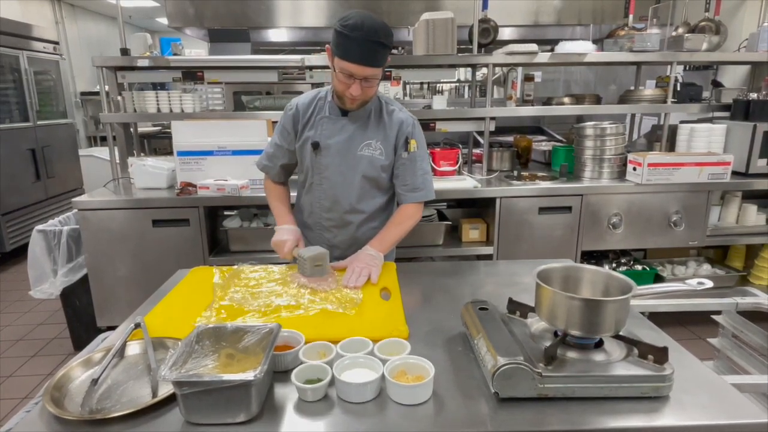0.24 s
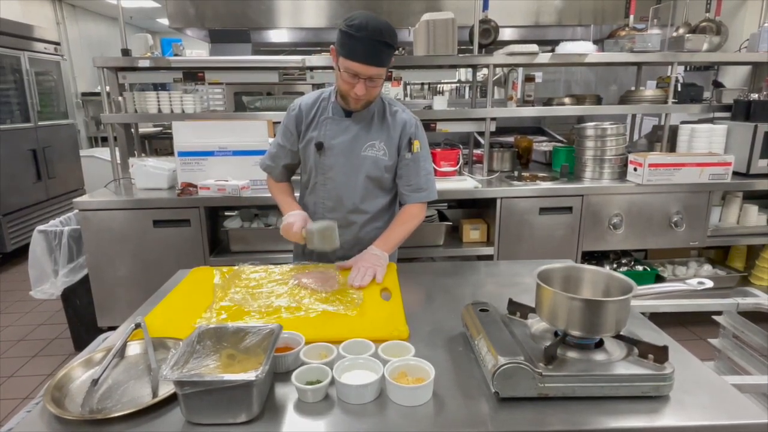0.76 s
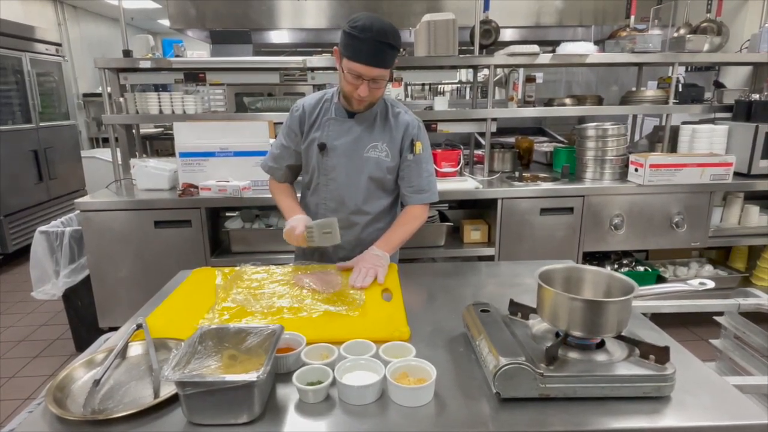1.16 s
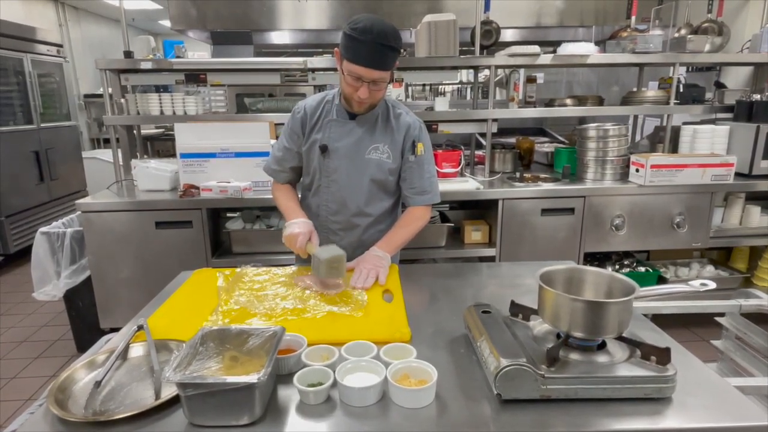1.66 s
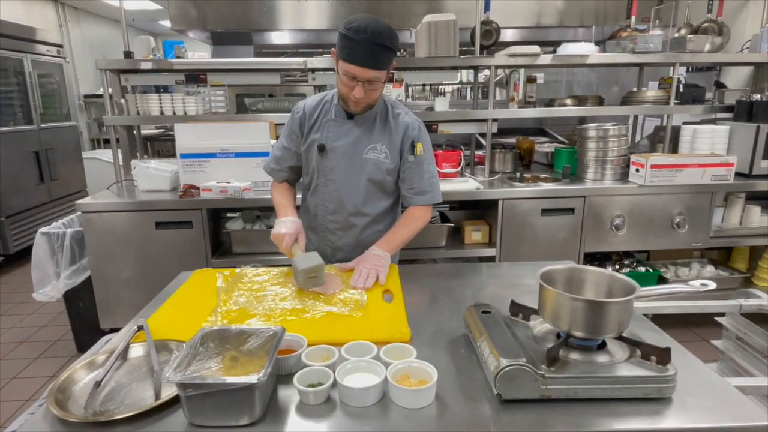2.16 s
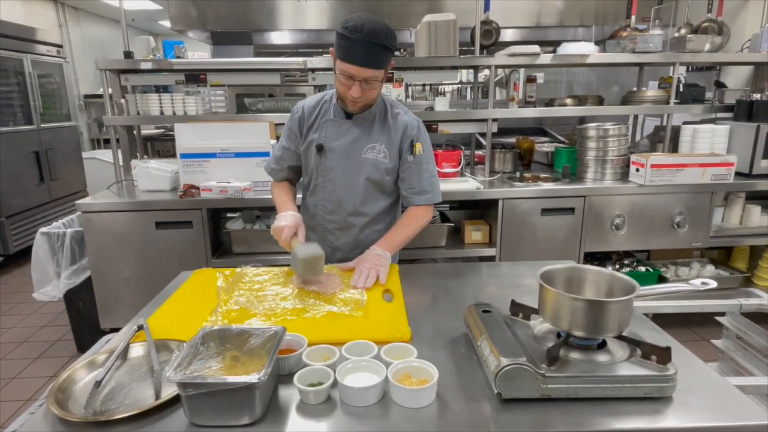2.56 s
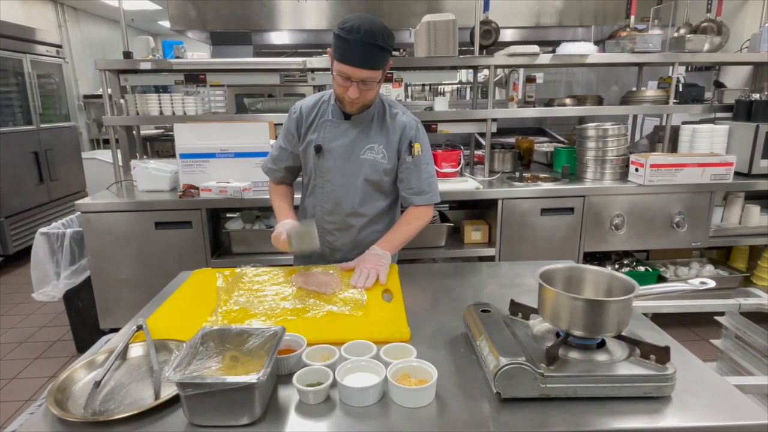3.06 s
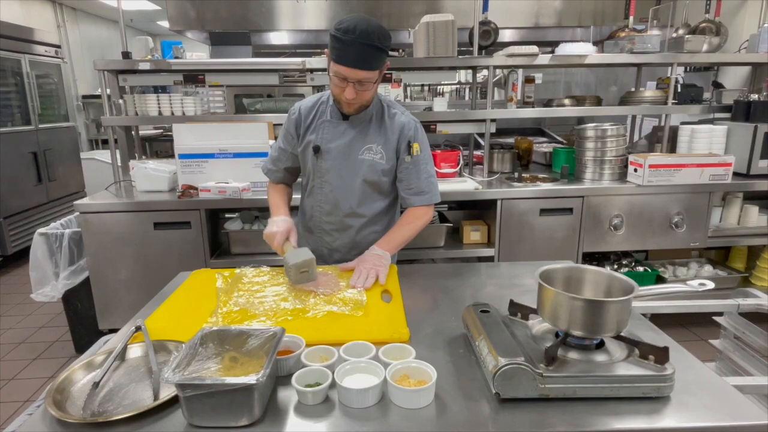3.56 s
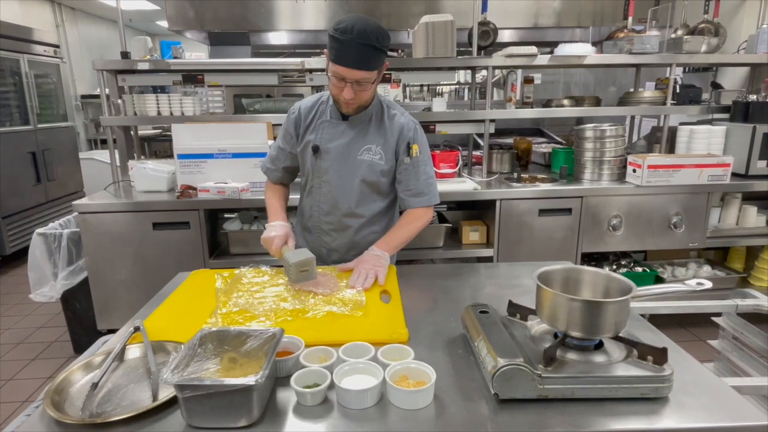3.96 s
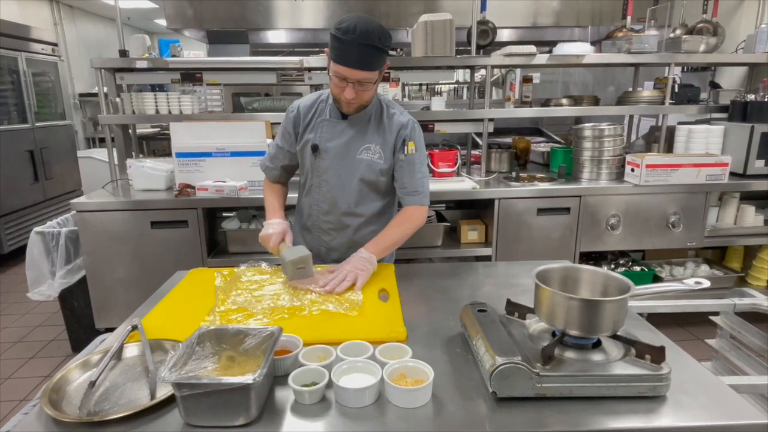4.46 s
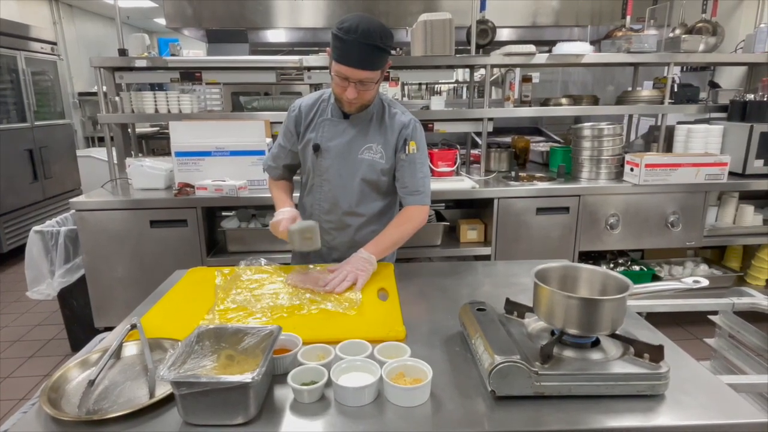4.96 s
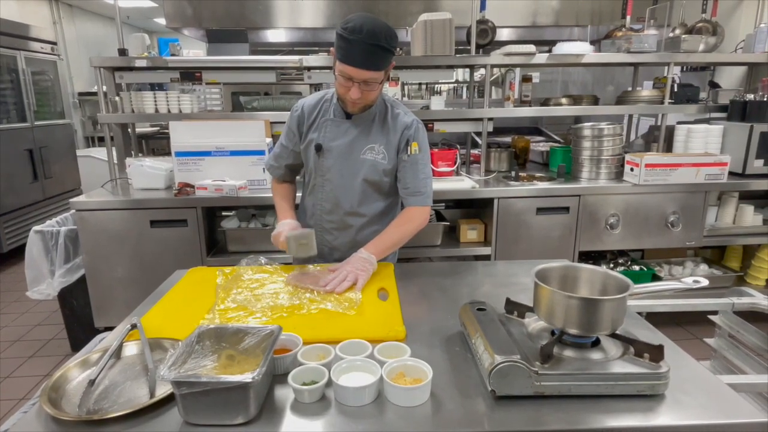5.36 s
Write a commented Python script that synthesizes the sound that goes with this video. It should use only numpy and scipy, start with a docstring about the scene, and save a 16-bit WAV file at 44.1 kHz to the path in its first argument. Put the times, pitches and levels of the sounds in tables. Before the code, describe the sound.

A metal mallet pounds meat under plastic film on a cutting board, close to the microphone, about three times a second from 0.1 seconds. Each blow is a wet slap with a low thump and a knock. Pans and a stove on the steel table clatter twice in quick succession after each hit, and a small dish chinks. The first blow is the hardest; they soften to their lightest around 1.5 seconds and are strong again from about 2.5. After a blow at 3.7 seconds comes a half-second gap, then four more, slightly weakening, the last at 5.3. The film crinkles softly around 1.9 and 4.5 seconds, and a faint low hum swells and fades around 4.5. The tiled kitchen adds a short, bright echo, and extractor fans rush quietly in the background throughout. The loudest peaks slightly overload the microphone.

```python
"""A wet slap and a low thump, close to the microphone: a metal mallet pounds chicken under plastic film.
The cutting board lies on a steel table in a tiled kitchen. At each blow, pans and a stove on the table
jump and clatter twice, on the rebound and on landing, and a small dish chinks. Between blows the film
crinkles twice, and a faint hum comes and goes once. Extractor fans run at the back of the room.
One channel; the loudest peaks overload the microphone."""
import sys
import numpy as np
from scipy import signal
from scipy.fft import rfft, irfft, next_fast_len
from scipy.io import wavfile
from scipy.ndimage import map_coordinates

SR = 44100
rng = np.random.default_rng(int(sys.argv[2]) if len(sys.argv) > 2 else 0)


def file_out(sig):
    """Save sig as 16-bit WAV at sys.argv[1]."""
    # one column per channel
    cols = np.atleast_2d(sig).T
    # limit, then scale
    lim = np.clip(cols, -1, 1)
    pcm = np.round(lim * 32767).astype(np.int16)
    wavfile.write(sys.argv[1], SR, pcm)


N = 247840
LEAD = SR // 2  # run-in, so the room already rings at the start
SPAN = N + LEAD

# mallet blows, the first only echoing into the start: t/s, force/dB, hardness/dB (low on thick meat)
MALLET_BLOWS = [(-.235, -1, -14), (0.1173, 1, 2), (0.4885, -1.7, -8), (0.8347, -4.7, 1), (1.1699, -5.7, 5),
                (1.4456, -10, 7), (1.7058, -10.7, -9), (1.998, -6.2, -5), (2.3398, -2.7, 1),
                (2.6847, -2, -3), (3.0232, -.9, -2), (3.3767, -1.2, -4), (3.7282, -.6, 2),
                (4.2416, -1.4, 2), (4.638, -2.7, 2), (5.0042, -2.6, 0), (5.3306, -4.9, .5)]
# the wrapped meat is pushed along the board: start/s, end/s, level/dB
MEAT_SLIDES = [(1.797, 2.08, -24), (4.359, 4.67, -23.5)]
# ringing modes: f/Hz, relative level/dB, t60/s
TABLE_MODES = [(55.4, -9, 0.23), (103, -5.5, 0.12), (193.2, -12.5, 0.16), (117.4, -19, 0.2),
               (53.1, -25.5, .7)]  # board and table top
HEAD_MODES = [(1294, -5, 0.079), (960, 3, 0.016), (1600, -8, 0.034)]  # mallet head on the board
PAN_MODES = [(395, -8, .1), (562, -3, .15), (598, -12, .45), (690, -8, .15), (1260, -2, .16),
             (1449, -6, .15), (1756, -3, .12), (1980, -4, .06), (2794, -1, .15), (3085, -4.5, .28),
             (3252, -2, .14), (4025, -10, .12), (4162, -11, .12), (6140, -4, .09)]  # pans and stove
DISH_MODES = [(3110, -9, .07), (5520, -7, .04), (5914, -5, .05), (6140, 0, .09), (6250, -8, .15),
              (6350, -1, .07), (8090, -6, .04), (8400, -5, .04)]  # small china dish
# noise spectra: f/Hz, relative level/dB
SLAP_SPECTRUM = [(200, -9), (1500, -19), (3000, 2), (5000, 1.5), (8000, 4.5), (10500, -2), (13000, -11.5),
                 (16000, -5.5)]  # wet film, struck
KNOCK_SPECTRUM = [(150, -21.5), (450, -5.5), (900, -6.5), (1300, -5), (1800, -7.5), (3500, -15),
                  (9000, -33)]  # board on steel
CLATTER_SPECTRUM = [(60, -32), (130, -3), (280, -5.5), (420, -0.5), (900, -2.5), (1800, 2), (2400, -1.5),
                    (4500, -5), (6500, -5.5), (8500, -7), (11500, -20.5), (16000, -37)]  # rattling cookware
SPARKLE_SPECTRUM = [(1000, -9), (4000, -11), (7000, 2.5), (10000, -10), (16000, -12)]  # hard contacts on metal
FILM_SPECTRUM = [(200, -16), (500, -5), (1000, -5), (2500, -10), (7000, -18.5), (10000, -24.5),
                 (16000, -49)]  # crinkling film
AIR_SPECTRUM = [(15, -31), (25, -1), (50, -17), (92, -27), (123, -9), (153, -15.5), (240, -12.5), (330, -8),
                (470, -12), (540, -7.5), (750, -10.5), (2000, -18.5), (6000, -33), (16000, -61)]  # air in the extractor hoods
# fan blade tones: f/Hz, level/dB
BLADE_TONES = [(242, -44.5), (528, -58), (603, -46)]
# decay of the tiled room: f/Hz, t60/s
ROOM_DECAY = [(60, 0.13), (250, 0.84), (600, 0.57), (2000, 0.63), (5000, 0.54), (8000, 0.48), (12000, 0.47),
              (16000, 0.4)]
# colour of its echo: f/Hz, relative level/dB
ROOM_COLOUR = [(60, -6), (200, -6), (600, 6), (2000, 4.5), (7000, 2.5), (12000, -11)]


def amp(db):
    """Decibels to gain."""
    return 10 ** (np.asarray(db) / 20)


def unit(x):
    """Scale to rms 1."""
    return x / np.sqrt(np.mean(x ** 2) + 1e-20)


def along(points, hz):
    """Read (f/Hz, value) points on a log frequency axis."""
    freqs, values = np.transpose(points)
    return np.interp(np.log(hz + 1), np.log(freqs + 1), values)


def noise(spectrum, size):
    """Coloured noise of rms 1."""
    m = next_fast_len(size + 4096)
    colour = amp(along(spectrum, np.fft.rfftfreq(m, 1 / SR)))
    return unit(irfft(rfft(rng.standard_normal(m)) * colour, m)[:size])


def wobble(rate, size):
    """A smooth random curve with rate knots a second."""
    knots = rng.standard_normal(int(size * rate / SR) + 4)
    return map_coordinates(knots, [np.arange(size) * rate / SR])


def burst(t, rise, t60):
    """An envelope that swells to 1 in rise seconds and then dies away."""
    return np.sin(np.clip(t / rise, 0, 1) * np.pi / 2) * amp(-60 * np.maximum(t - rise, 0) / t60)


def ring(modes, t, scatter_db):
    """Damped modes at chance strengths; neighbours in the list swing in opposite senses."""
    sound = np.zeros(len(t))
    for k, (hz, db, t60) in enumerate(modes):
        envelope = amp(db + scatter_db * rng.standard_normal() - 60 * t / t60)
        sound += (-1) ** (k + 1) * envelope * np.sin(2 * np.pi * hz * t)
    return sound


def add(track, s, sound):
    """Mix a sound into the track at time s."""
    start = max(LEAD + round(s * SR), 0)
    track[start:start + len(sound)] += sound[:len(track[start:])]


def slap():
    """Nearest the microphone, the wet film snaps on contact and again, weakly, as the board rebounds."""
    track, t = np.zeros(SPAN), np.arange(SR // 10) / SR
    for s, force_db, hardness_db in MALLET_BLOWS:
        snaps = burst(t, rise=.00064, t60=.013) + amp(-8) * burst(t - .009, rise=.00025, t60=.0064)
        add(track, s, amp(-3.7 + force_db + hardness_db) * snaps * noise(SLAP_SPECTRUM, len(t)))
    return track


def mallet():
    """The head knocks on the board through the meat and bends the table top."""
    track, t = np.zeros(SPAN), np.arange(SR // 2) / SR
    for s, force_db, hardness_db in MALLET_BLOWS:
        # a softer blow rests longer on the meat and favours the lowest modes
        db_per_octave = .5 * (force_db + 2.1)
        modes = [(hz, db + db_per_octave * np.log2(hz / 90), t60) for hz, db, t60 in TABLE_MODES]
        thump = ring(modes, t, scatter_db=.5) * (1 - np.exp(-t / .0008))
        add(track, s, amp(-.2 + .92 * force_db) * thump)
        head = ring(HEAD_MODES, t, scatter_db=2) * (1 - np.exp(-t / .00097))
        # the board knocks, then chatters on the steel
        knocks = burst(t, rise=.0014, t60=.049) + amp(-2.5) * burst(t - .0095, rise=.00094, t60=.18)
        board = knocks * noise(KNOCK_SPECTRUM, len(t))
        add(track, s, amp(-9 + force_db + hardness_db) * (board + amp(4.5) * head))
    return track


def cookware():
    """Along the table, jolted pans and stove rattle against the rebounding top, then land and settle."""
    track, t = np.zeros(SPAN), np.arange(SR // 2) / SR
    contacts_per_s, contact_decay_s = 900, .00045
    for s, force_db, _ in MALLET_BLOWS:
        rebound = amp(-3 + 2.15 * force_db) * burst(t - .0195, rise=.01, t60=.14)
        flight_s = .059 + .0008 * force_db  # a harder blow throws the cookware higher
        crash = amp(-2) * burst(t - flight_s, rise=.0032, t60=.094)  # the heavy pieces land together
        settling = amp(-1) * burst(t - flight_s, rise=.011, t60=.26)
        landing = amp(-5.5 + 1.05 * force_db) * np.hypot(crash, settling)
        # many separate metal contacts roughen the envelope
        contacts = (rng.random(len(t)) < contacts_per_s / SR) * rng.exponential(size=len(t))
        power = signal.lfilter([1], [1, -np.exp(-1 / (contact_decay_s * SR))], contacts)
        rattle = np.hypot(rebound, landing) * np.sqrt((1 + power / power.mean()) / 2)
        add(track, s, amp(3) * rattle * noise(CLATTER_SPECTRUM, len(t)))
        # the hardest contacts are the brightest
        peaks = rattle ** 3 / rattle.max() ** 2
        add(track, s, amp(-6.5) * peaks * noise(SPARKLE_SPECTRUM, len(t)))
        # the same contacts keep the pans ringing
        metal = ring(PAN_MODES, t, scatter_db=2.9)
        ringing = signal.fftconvolve(rattle * rng.standard_normal(len(t)), metal / np.linalg.norm(metal))
        add(track, s, amp(-8.3) * ringing)
    return track


def dish():
    """On the same table a dish chinks after every blow, however soft, in ever shorter, gentler hops."""
    track, t = np.zeros(SPAN), np.arange(SR // 4) / SR
    first_landing_s, hop_s, hop_ratio = .068, .041, .6
    for s, *_ in MALLET_BLOWS:
        for hop in range(3):
            delay = first_landing_s + hop_s * np.sum(hop_ratio ** np.arange(hop))
            tick = burst(t, rise=.0006, t60=.018) * noise(SPARKLE_SPECTRUM, len(t))
            chink = ring(DISH_MODES, t, scatter_db=3.5) + amp(7.5 - 3 * hop) * tick
            add(track, s + delay + rng.normal(0, .001), amp(-17 - 5.5 * hop) * chink)
    return track


def film():
    """Close by, the film crinkles as a hand shifts the meat on the board."""
    track = np.zeros(SPAN)
    for start, end, db in MEAT_SLIDES:
        size = round((end - start) * SR)
        crinkle = unit(noise(FILM_SPECTRUM, size) * amp(.83 * wobble(351, size)))
        add(track, start, amp(db) * np.sqrt(np.hanning(size)) * crinkle)
    return track


def brief_hum(start_s=4.35, length_s=.38, hz=308):
    """A faint low tone swells and fades under the blows."""
    track, t = np.zeros(SPAN), np.arange(round(length_s * SR)) / SR
    phase = 2 * np.pi * hz * t + .91 * wobble(20.8, len(t))
    add(track, start_s, amp(-28) * np.sqrt(np.hanning(len(t))) * np.sin(phase))
    return track


def kitchen_echo(direct):
    """All around, steel and tiles answer with a bright tail whose treble dies before its middle."""
    # sound comes from ever different spots on the table, each with its own echo
    shares = np.array([wobble(45, SPAN) for _ in range(5)])
    shares /= np.linalg.norm(shares, axis=0)
    echo = np.zeros(SPAN)
    for share in shares:
        hz, t, spectra = signal.stft(rng.standard_normal(SR), SR, nperseg=256)
        fade = amp(along(ROOM_COLOUR, hz)[:, None] - 60 * t / along(ROOM_DECAY, hz)[:, None])
        tail = signal.istft(spectra * fade, SR, nperseg=256)[1]
        tail *= np.clip((np.arange(len(tail)) / SR - .004) / .0048, 0, 1)  # reflections build up
        echo += signal.fftconvolve(share * direct, tail / np.linalg.norm(tail))[:SPAN]
    return echo


def fans():
    """Extractor hoods at the back of the room: rushing air and a few unsteady blade tones."""
    t = np.arange(SPAN) / SR
    tones = sum(amp(db) * np.sqrt(2) * np.sin(2 * np.pi * hz * t + 1.33 * wobble(26, SPAN))
                for hz, db in BLADE_TONES)
    air = amp(-31 + 1.1 * wobble(7.5, SPAN)) * noise(AIR_SPECTRUM, SPAN)
    return air + tones


def scene():
    """One microphone at the table: the blows and clatter in front, the room and the fans behind."""
    slaps, knocks, clatter = slap(), mallet(), cookware() + dish()
    echo = kitchen_echo(amp(-4) * slaps + amp(-9.5) * (knocks + clatter))
    return (slaps + knocks + clatter + echo + film() + brief_hum() + fans())[None, LEAD:]


def record(dry):
    """The microphone input clips at full scale and keeps nothing above its band limit."""
    top_hz, skirt_hz = 15900, 500
    m = next_fast_len(N + 8192)
    passband = np.clip((top_hz - np.fft.rfftfreq(m, 1 / SR)) / skirt_hz + .5, 0, 1)
    clipped = np.clip(dry, -1, 1)
    return irfft(rfft(clipped, m) * passband, m)[:, :N]


dry = scene()
out = record(dry)
file_out(out)
```